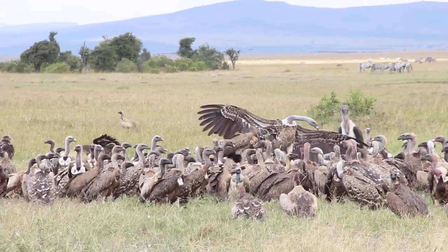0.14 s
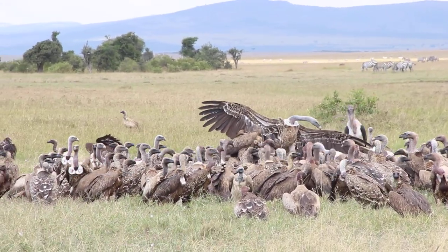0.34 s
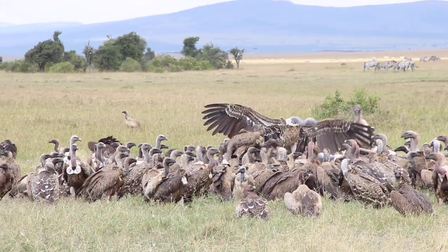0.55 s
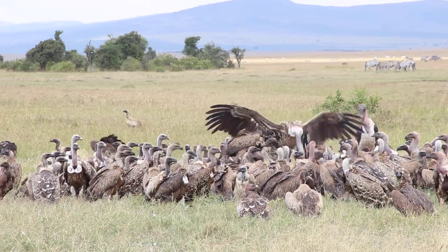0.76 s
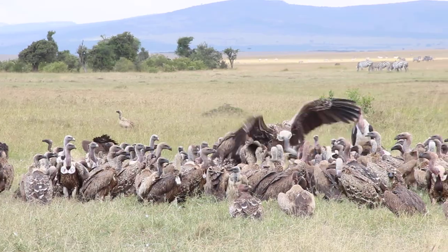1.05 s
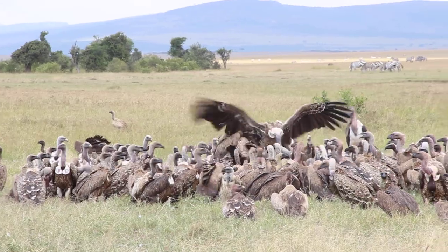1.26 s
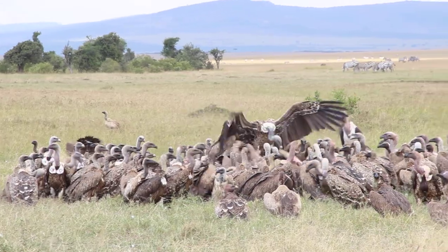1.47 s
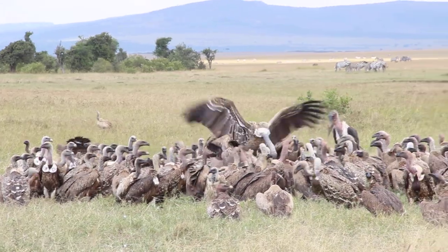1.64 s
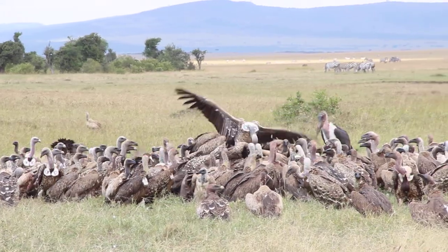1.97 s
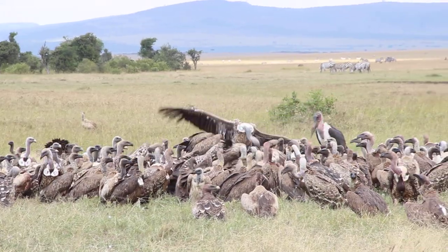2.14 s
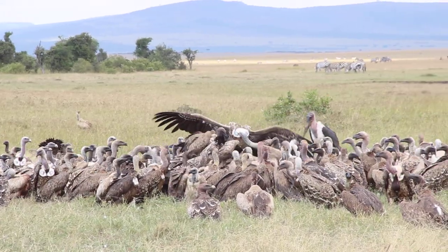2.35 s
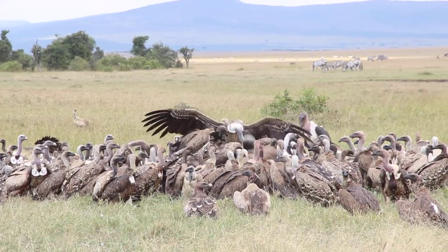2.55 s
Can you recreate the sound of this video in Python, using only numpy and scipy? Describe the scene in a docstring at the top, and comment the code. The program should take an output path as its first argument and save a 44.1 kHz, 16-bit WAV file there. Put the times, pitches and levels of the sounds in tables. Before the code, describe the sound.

A dense flock of vultures rasps and whinnies outdoors at a moderate distance; quick hoarse calls and thin whining give way to a sharp squawk and harsh rattling hiss, with high insect chirping, soft wind thuds and faint microphone hiss.

```python
"""Hoarse rasps come first, from a crowd of vultures squabbling over a carcass on open grassland, some
tens of metres from the microphone; a thin whine, squeals, a long grating hiss and a loud squawk follow.
Each rasp, squeal, hiss and squawk is a train of uneven windpipe pulses ringing the throat; the whine sums
harmonics. The flock behind is many such pulses, coloured. An insect chirps in the grass with sliding
tones, wind thuds on the microphone as decaying low tones, and the preamplifier hisses as noise."""
import sys
import numpy as np
from scipy import signal
from scipy.fft import rfft, irfft
from scipy.io import wavfile
from scipy.ndimage import uniform_filter1d

SR = 44100
rng = np.random.default_rng(int(sys.argv[2]) if len(sys.argv) > 2 else 0)


def inscribe(sig):
    """Save sig as 16-bit PCM at rate SR to the path in sys.argv[1].

    A 1-D sig is mono; a 2-D sig holds one channel per row.
    Samples are clipped to [-1, 1] before scaling.
    """
    pcm = np.round(np.clip(np.atleast_2d(sig).T, -1, 1) * 32767)
    wavfile.write(sys.argv[1], SR, pcm.astype(np.int16))


def makeup_ratio(level_db):
    """Linear amplitude ratio for a level in decibels (20 dB per factor of ten)."""
    decades = np.asarray(level_db, float) / 20
    return 10 ** decades


N = 119511  # samples


def level(x, db):
    """Scale to an rms level in dB."""
    return x * makeup_ratio(db) / np.sqrt(np.mean(x ** 2))


def ring(x, hz, width):
    """One resonance, gain 1 at its centre."""
    return signal.lfilter(*signal.iirpeak(hz, hz / width, fs=SR), x)


def steep(x, hz, width):
    """A resonance applied twice, the second time twice as wide."""
    return ring(ring(x, hz, width), hz, 2 * width)


def dull(x, hz):
    """Take away the treble above hz."""
    return signal.sosfilt(signal.butter(3, hz, fs=SR, output="sos"), x)


def colour(x, table):
    """Shape the spectrum by points of (Hz, gain in dB), joined along log frequency."""
    hz, db = np.array(table).T
    log_hz = np.log(np.arange(len(x) // 2 + 1) * SR / len(x) + 1)
    return irfft(rfft(x) * makeup_ratio(np.interp(log_hz, np.log(hz), db)), len(x))


def wander(size):
    """Slow chance, spread 1: noise averaged twice over size samples."""
    return level(uniform_filter1d(uniform_filter1d(rng.standard_normal(N), size), size), 0)


def snaps(rate, chance, jitter, scatter_db, breath_db):
    """Windpipe pulses of uneven spacing and size, with a puff of breath after each; rms 1."""
    puff_decay_s = 0.0029
    turns = np.cumsum(np.exp(jitter * chance[0] - jitter ** 2 / 2)) - .5
    cycles = np.cumsum(rate) / SR
    at = np.interp(turns[turns < cycles[-1]], cycles, np.arange(len(rate)))
    i = at.astype(int)
    size = makeup_ratio(scatter_db * chance[1, :len(at)])
    # each pulse is shared between the two samples around its exact time
    pulses = np.zeros(len(rate) + 1)
    np.add.at(pulses, i, size * (1 + i - at))
    np.add.at(pulses, i + 1, size * (at - i))
    pulses = pulses[:-1]
    puff = signal.lfilter([1], [1, -np.exp(-1 / (puff_decay_s * SR))], pulses)
    breath = level(puff * np.resize(chance[2], len(rate)), breath_db)
    return level(level(pulses, 0) + breath, 0)


def resonances(x, table):
    """Resonances side by side, from rows of (Hz, width in Hz, dB)."""
    return sum(makeup_ratio(db) * steep(x, hz, width) for hz, width, db in table)


def throat(x, throat_hz, upper_db):
    """The resonances of neck and open beak; rms 1."""
    # Each row: multiple of the throat frequency, width in Hz of the first pass, relative gain in dB.
    lower_rows = [(0.7, 236, 0.5), (1.003, 283, 7), (1.15, 635, 1.5), (1.3, 290, -12)]
    # The same columns for the upper group, which upper_db raises or lowers as a whole.
    upper_rows = [(1.85, 720, 3.5), (2.4, 800, -11.5)]
    lower = resonances(x, [(m * throat_hz, width, db) for m, width, db in lower_rows])
    upper = resonances(x, [(m * throat_hz, width, db) for m, width, db in upper_rows])
    return level(lower + makeup_ratio(upper_db) * upper, 0)


def add(out, start, sound):
    """Mix a sound in at a time in seconds."""
    i = int(start * SR)
    part = sound[max(-i, 0):N - i]
    first = max(i, 0)
    out[first:first + len(part)] += part


def shape(length):
    """Progress through a call, and its envelope: attack, sagging hold, release around its end."""
    attack_s, half_release_s, sag_db = 0.006, 0.012, -5
    t = np.arange(int((length + half_release_s) * SR)) / SR
    progress = t / length
    release = (length + half_release_s - t) / (2 * half_release_s)
    gate = np.clip(np.minimum(t / attack_s, release), 0, 1)
    return progress, gate * makeup_ratio(sag_db * progress)


def rasps():
    """Short hoarse calls: uneven pulses at a fixed mean rate, each call through its own throat."""
    # Each row: start in seconds, length in seconds, level in dB before envelope and scene filters,
    # throat frequency in Hz, gain of the upper resonances in dB.
    rasp_rows = [(0, 0.019, -34.5, 2520, -11), (0.047, 0.18, -39.5, 2000, -2.5),
                 (0.297, 0.058, -38, 1780, -5), (0.398, 0.075, -38.5, 1800, 1),
                 (0.183, 0.018, -44, 4750, -30), (0.507, 0.077, -45, 3800, -30),
                 (0.596, 0.023, -57, 3000, -18), (0.77, 0.049, -52, 3360, -20),
                 (0.545, 0.049, -41.5, 1530, -4), (0.592, 0.056, -39, 1670, -23),
                 (0.662, 0.033, -40, 2430, -19), (0.691, 0.06, -35, 1900, -8),
                 (0.748, 0.072, -35, 1710, -26), (0.785, 0.035, -36, 2130, -2.5),
                 (0.813, 0.042, -35.5, 1310, -6), (0.85, 0.027, -32, 2140, -1),
                 (0.887, 0.013, -34, 1660, -6), (0.941, 0.032, -32, 1860, -8),
                 (1.025, 0.026, -37.5, 2150, -17), (1.048, 0.019, -37.5, 1706, -18),
                 (1.146, 0.23, -41.5, 2840, -14), (1.181, .045, -33.5, 2070, -16),
                 (1.216, 0.096, -46, 4750, -32), (1.229, 0.11, -34.5, 1945, -16),
                 (1.28, 0.059, -38.5, 2980, -15), (1.347, 0.026, -55, 1690, -3),
                 (1.443, 0.04, -36.5, 1590, -8), (1.51, 0.54, -36.5, 1830, -37),
                 (1.651, 0.027, -34, 2380, -32), (2.12, 0.016, -28, 1620, 9),
                 (2.159, 0.11, -35.5, 2156, -4)]
    pulses_per_s, jitter, scatter_db, breath_db = 540, .14, 2.0, -6
    out = np.zeros(N)
    chances = rng.standard_normal((len(rasp_rows), 3, 10000))
    for (start, length, db, throat_hz, upper_db), chance in zip(rasp_rows, chances):
        progress, envelope = shape(length)
        rate = np.full(len(progress), pulses_per_s)
        pulses = snaps(rate, chance, jitter, scatter_db, breath_db)
        add(out, start, makeup_ratio(db) * envelope * throat(pulses, throat_hz, upper_db))
    return out


def flock(t):
    """Many farther birds at once: a hiss of dense uneven pulses, and voices that glide, swell and fade."""
    # Each row: time in seconds, level in dB ahead of the scene's filter.
    flock_levels = [(0.0, -42), (0.14, -42), (0.77, -42), (0.96, -45.5), (1.14, -44.5), (1.29, -36.5),
                    (1.54, -36.5), (1.63, -34), (1.85, -39), (2.24, -37.5), (2.45, -40), (2.71, -38.5)]
    # Distant colour. Each row: frequency in Hz, gain in dB.
    flock_colour = [(530, -60), (900, 1), (951, -27), (1120, -4), (1480, -0.5), (1870, 2), (2090, -4.5),
                    (2310, -0.5), (2850, -6), (3970, -11), (6000, -30.5), (7800, -26), (13200, -120)]
    # Voiced whinnies in the crowd: the middle pitch of each in Hz.
    whinny_hz = [423.5, 503, 549.5, 643.5, 714]
    voices_db = -2.5  # against pulses of rms about 1
    s, db = np.array(flock_levels).T
    dense = snaps(np.full(N, 1200), rng.standard_normal((3, N)), .7, 1.8, 4.8)
    dense = dense * makeup_ratio(1.3 * wander(size=900))
    voices = np.zeros(N)
    for hz in whinny_hz:
        pitch = hz * (1 + 0.05 * wander(size=4000))
        voice = snaps(pitch, rng.standard_normal((3, N)), 0.0151, 1.0, -21.0)
        voices += voice * makeup_ratio(6.1 * wander(size=2500))
    crowd = colour(dense + level(voices, voices_db), flock_colour)
    return level(crowd, 0) * makeup_ratio(np.interp(t, s, db))


def chirp(length, top_hz, end_hz):
    """A wing stroke: a tone that slides down under a half-sine swell."""
    u = np.arange(int(length * SR)) / (length * SR)
    hz = top_hz + (end_hz - top_hz) * u
    return np.sqrt(2) * np.sin(np.pi * u) * np.sin(2 * np.pi * np.cumsum(hz) / SR)


def insect():
    """An insect in the grass: trills of longer wing strokes and buzzes of three short ones."""
    # Each row: start of the trill in seconds, level in dB before stroke gains.
    trill_rows = [(-.025, -53.5), (.781, -57.5), (1.378, -54.5), (1.92, -54.5), (2.494, -50.5)]
    # Each row: stroke start in seconds after the trill's start, gain in dB before chance.
    trill_strokes = [(0, -9), (.017, -3), (.033, 0), (.052, 0), (.075, 0), (.1, 0)]
    # Each row: start of the buzz in seconds, level in dB before stroke gains.
    buzz_rows = [(.136, -52.5), (.214, -55), (.296, -55), (.398, -55.5), (.525, -53), (.677, -55),
                 (.939, -50), (1.028, -52.5), (1.14, -53), (1.26, -52), (1.537, -54), (1.619, -51),
                 (1.703, -50), (1.799, -52), (2.08, -50), (2.165, -49), (2.262, -50), (2.38, -52),
                 (2.655, -52)]
    # Each row: stroke start in seconds after the buzz's start, gain in dB before chance.
    buzz_strokes = [(0, -5.5), (.01, -1), (.02, -5.5)]
    songs = [(trill_rows, trill_strokes, chirp(0.021, 7250, 6250)),
             (buzz_rows, buzz_strokes, chirp(0.0095, 7000, 6130))]
    out = np.zeros(N)
    for rows, strokes, tone in songs:
        chances = rng.standard_normal((len(rows), len(strokes)))
        for (start, db), chance in zip(rows, chances):
            for (late, gain_db), vary in zip(strokes, chance):
                add(out, start + late, makeup_ratio(db + gain_db + 1.4 * vary) * tone)
    return out


def air_noise():
    """Faint murmur of the air: noise spread from bass to about 1 kHz, strongest near 1 kHz."""
    # Each row: frequency in Hz, relative gain in dB.
    air_colour = [(12, -46), (20, -10), (27, -13.5), (80, -18), (163, -5.5), (208, -9.5), (511, -13.5),
                  (782, -9.5), (937, -24.5), (1000, -2.5), (1300, -23.5), (2200, -120)]
    return level(colour(rng.standard_normal(N), air_colour), -56)


def preamp_hiss():
    """Even hiss of the preamplifier: white noise."""
    return level(rng.standard_normal(N), -59)


def narrow_murmurs():
    """Faint narrow murmurs: noise through single steep resonances."""
    # Each row: frequency in Hz, width in Hz of the first pass, level in dB.
    murmur_rows = [(605.7, 31, -64), (800, 57, -59.5)]
    return sum(level(steep(rng.standard_normal(N), hz, width), db) for hz, width, db in murmur_rows)


def wind_thuds():
    """Wind thuds on the microphone: low tones of chance phase that swell quickly and die away."""
    # Each row: start in seconds, peak of the envelope in dB, frequency in Hz.
    thud_rows = [(0.026, -41.5, 45.6), (0.11, -43, 40.4), (0.297, -45.5, 69.5), (0.382, -44.5, 48.5),
                 (0.551, -50.5, 26.9), (0.999, -59, 40.5), (1.069, -50.5, 64), (1.11, -43.5, 39.2),
                 (1.199, -68, 26.9)]
    peak_s, length_s = 0.037 / 3, 0.074
    u = np.arange(int(length_s * SR)) / SR
    envelope = u / peak_s * np.exp(1 - u / peak_s)
    out = np.zeros(N)
    for (start, db, hz), turn in zip(thud_rows, rng.random(len(thud_rows))):
        add(out, start, makeup_ratio(db) * envelope * np.sin(2 * np.pi * (hz * u + turn)))
    return out


def whine(t):
    """A thin wavering voice among the birds: clean harmonics, weakened where the ground echo cancels."""
    # Each row: time in seconds, pitch in Hz before its waver, level in dB before harmonic gains and waver.
    whine_rows = [(.06, 235, -57), (.2, 250, -54), (.29, 300, -50), (.33, 325, -48), (.38, 285, -50),
                  (.42, 280, -48), (.56, 292, -49), (.595, 332, -49), (.64, 305, -48), (.7, 282, -48),
                  (.76, 270, -48), (.87, 268, -51), (.97, 271, -55), (1.079, 307, -54)]
    # Each row: multiple of the pitch, gain in dB before the notch and the waver.
    whine_harmonics = [(2, -21), (3, -10), (4, -4), (5, -9), (6, -7), (7, -14), (8, -5)]
    notch_hz, notch_width_hz, notch_db = 970, 45, -14  # where the echo off the ground cancels it
    s, hz, db = np.array(whine_rows).T
    pitch = np.interp(t, s, hz) * (1 + .008 * wander(size=150))
    phase = 2 * np.pi * np.cumsum(pitch) / SR
    fade = np.clip(np.minimum(t - s[0], s[-1] - t) / 0.014, 0, 1)
    fade = fade * makeup_ratio(0.61 * wander(size=500))
    tones = np.zeros(N)
    for k, gain_db in whine_harmonics:
        notch = notch_db * np.exp(-((k * pitch - notch_hz) / notch_width_hz) ** 2)
        tones += makeup_ratio(gain_db + notch + 3.5 * wander(size=900)) * np.sin(k * phase)
    return np.sqrt(2) * fade * makeup_ratio(np.interp(t, s, db)) * tones


def squeals():
    """Calls with steady pulses, so that harmonics show, through two throat resonances."""
    # Each row: start in seconds, length in seconds, level in dB before envelope and scene filters,
    # pitch in Hz at start, middle and end.
    squeal_rows = [(0.091, 0.14, -42, 620, 645, 635), (1.117, 0.03, -36, 410, 565, 450),
                   (1.164, 0.026, -33, 380, 455, 545), (1.228, .06, -38, 940, 955, 950)]
    throat_hz, upper_db = 1640, -19
    out = np.zeros(N)
    chances = rng.standard_normal((len(squeal_rows), 3, 8000))
    for (start, length, db, first, middle, last), chance in zip(squeal_rows, chances):
        u, envelope = shape(length)
        bend = middle - (first + last) / 2
        pitch = first + (last - first) * u + bend * 4 * u * (1 - u)
        pulses = snaps(pitch, chance, .012, .7, -14.)
        upper = makeup_ratio(upper_db) * steep(pulses, 2 * throat_hz, 3200)
        voice = level(steep(pulses, throat_hz, 820) + upper, 0)
        add(out, start, makeup_ratio(db) * envelope * voice)
    return out


def grate(t):
    """The long grating hiss: slow, hard snaps through a wide-open beak, with a fainter, faster second bird."""
    # Each row: time in seconds, pulses per second of the first bird, level in dB ahead of the scene's
    # filter, level of the top snap in dB relative to that.
    grate_rows = [(1.38, 300, -46, -40), (1.624, 279, -39, -36), (1.66, 290, -40, -36),
                  (1.76, 261, -39, -38), (1.886, 275, -38, -44), (1.986, 281, -35.5, -42),
                  (2.12, 252, -34, -38), (2.19, 267, -31.5, -34), (2.28, 262, -31.5, -34),
                  (2.334, 252, -33.5, -32), (2.47, 245, -34.5, -31), (2.58, 262, -35, -40),
                  (2.71, 259, -35, -40)]
    # The open throat. Each row: frequency in Hz, width in Hz of the first pass, relative gain in dB.
    grate_throat = [(800, 120, -44), (1706, 950, 4), (2070, 470, 0), (3120, 620, 5.5), (3530, 200, -9),
                    (4750, 280, -5), (5260, 230, -16.5)]
    snap_hz, snap_width_hz, dull_hz = 9400, 2600, 4900
    s, rate, db, snap_db = np.array(grate_rows).T
    rate = np.interp(t, s, rate)
    chance = rng.standard_normal((2, 3, N))
    first_bird = snaps(rate, chance[0], .05, 2.5, -14.)
    second_bird = makeup_ratio(-7) * snaps(1.3 * rate, chance[1], .2, 3., -12.)
    pulses = (first_bird + second_bird) * makeup_ratio(1.3 * wander(size=400))
    body = dull(level(resonances(pulses, grate_throat), 0), dull_hz)
    top = makeup_ratio(np.interp(t, s, snap_db)) * level(steep(pulses, snap_hz, snap_width_hz), 0)
    fade_in = np.clip((t - s[0]) / 0.068, 0, 1)
    return (body + top) * makeup_ratio(np.interp(t, s, db)) * fade_in


def squawk():
    """A near bird's one loud, dense rasp of sharp pulses that slow down."""
    # One row: start in seconds, length in seconds, level in dB before envelope and scene filters,
    # pulses per second at start and at end.
    squawk_row = (1.648, .175, -23.5, 520, 330)
    # Its throat. Each row: frequency in Hz, width in Hz of the first pass, relative gain in dB.
    squawk_throat = [(1296, 280, -1.5), (1740, 540, 4.5), (2150, 380, -17)]
    start, length, db, first, last = squawk_row
    u, envelope = shape(length)
    envelope = envelope * np.clip(u / .06, 0, 1)  # a softer onset
    pulses = snaps(first + (last - first) * u, rng.standard_normal((3, 10000)), .25, 2.5, -3.)
    out = np.zeros(N)
    add(out, start, makeup_ratio(db) * envelope * level(resonances(pulses, squawk_throat), 0))
    return out


def over_grass(birds):
    """The path over the grass, which cancels nearly all that lies under a steep edge."""
    high = signal.butter(6, 1093, "high", fs=SR, output="sos")
    return signal.sosfilt(high, birds) + makeup_ratio(-53.5) * birds


def scene():
    """Birds over grass, with whine, insect and air, on one channel."""
    t = np.arange(N) / SR
    calls = dull(rasps() + squeals() + squawk(), 5220)  # calls carry little above this
    birds = over_grass(calls + grate(t) + flock(t))
    air = air_noise() + preamp_hiss() + narrow_murmurs() + wind_thuds()
    return (birds + whine(t) + insect() + air)[None]


def roll_off(x):
    """The treble ends steeply here."""
    return signal.sosfilt(signal.butter(12, 16770, fs=SR, output="sos"), x)


def record(dry):
    """The microphone signal loses its top above 15700 Hz and gains a small constant offset."""
    cut = signal.sosfilt(signal.ellip(12, .2, 70, 15700, fs=SR, output="sos"), dry)
    mix = cut + 0.00113
    return roll_off(mix)


dry = scene()
out = record(dry)
inscribe(out)
```